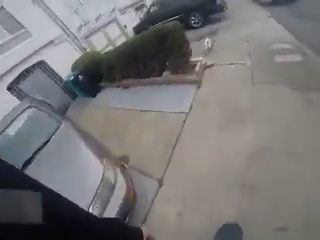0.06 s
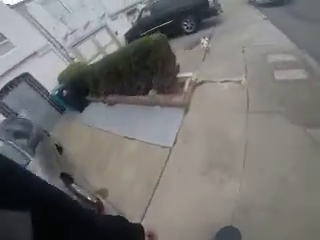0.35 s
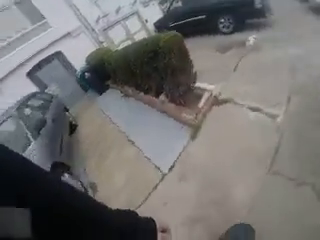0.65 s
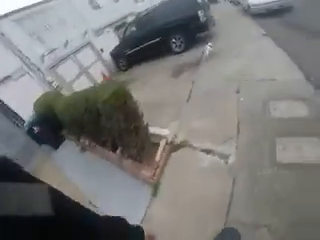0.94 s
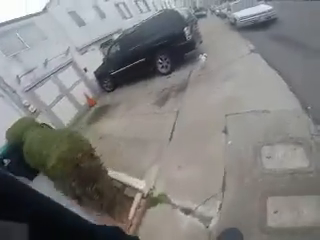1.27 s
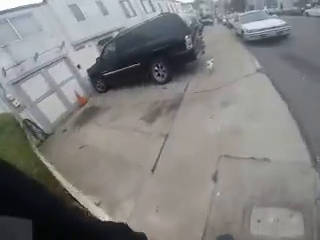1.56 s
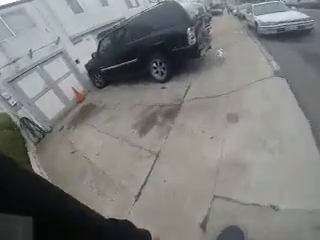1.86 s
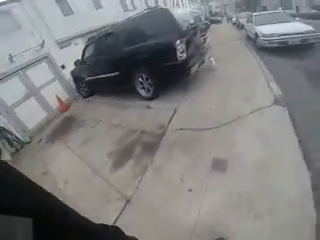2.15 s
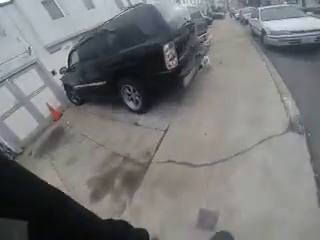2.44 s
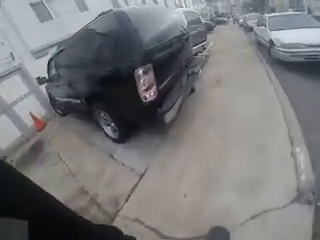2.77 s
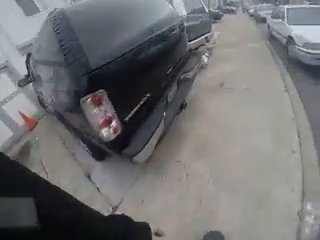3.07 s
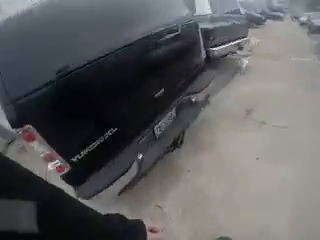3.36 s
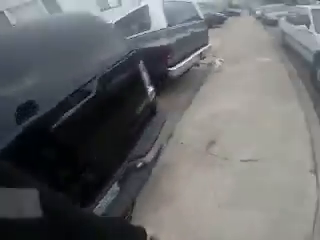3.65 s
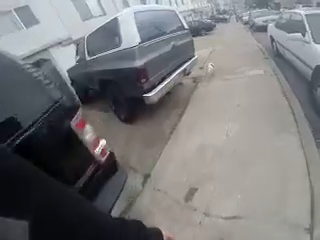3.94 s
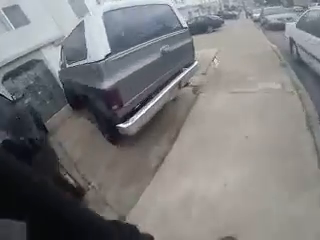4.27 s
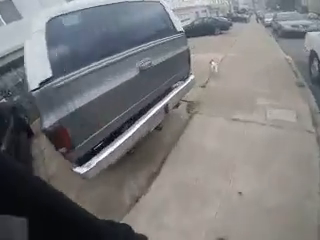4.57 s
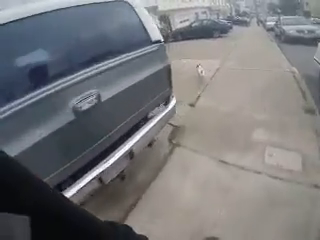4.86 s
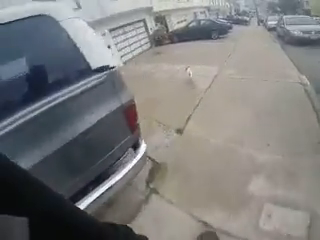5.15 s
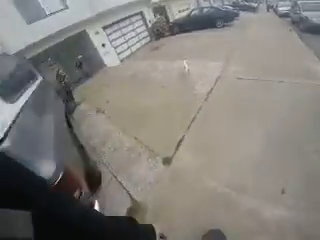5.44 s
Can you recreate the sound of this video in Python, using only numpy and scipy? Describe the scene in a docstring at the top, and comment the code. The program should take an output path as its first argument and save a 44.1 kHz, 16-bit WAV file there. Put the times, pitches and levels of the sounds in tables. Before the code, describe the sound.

Skateboard wheels roll on a concrete sidewalk throughout, a rough low rumble with a gritty crunch and faint hiss, heard from a camera worn on the rider. A few soft thumps and plastic ticks come right at the start. From about 0.7 to 1.1 seconds the camera jolts in the loudest flurry of close thumps, ticks and clothing rubs, with a crunch of gravel. The wheels clack over cracks around 1.2 to 1.5 seconds, then more strongly at 2.2, 2.4 and 3 seconds, each a hollow knock with a metallic rattle. A second cluster of ticks, thumps and rubbing comes from 3.2 to 3.7 seconds. Rolling continues with lighter clacks near 4.3 and 4.5, a brief wheel hiss just after 5, and a sharp clack, thumps and a tick around 5.4 to 5.6. Low wind buffets the microphone, puffing up with each jolt.

```python
"""A plastic tick and a soft thump over rumbling wheels: a skateboard on concrete, from a body camera.
The wheels shake the deck, crunch over grit and gravel, hiss as they slip and clack across cracks.
Jolts shake the camera: its case ticks on the mount, thumps against the rider and rubs on clothing.
Underneath, air buffets the microphone and puffs up with every jolt."""
import sys
import numpy as np
from scipy import signal
from scipy.fft import rfft, irfft, next_fast_len
from scipy.io import wavfile
from scipy.ndimage import uniform_filter1d

SR = 44100
rng = np.random.default_rng(int(sys.argv[2]) if len(sys.argv) > 2 else 0)


def bounce(signal):
    """Save signal as a 16-bit WAV file at the path given by the first command-line argument."""
    frames = np.transpose(np.atleast_2d(signal))
    limited = np.clip(frames, -1, 1)
    pcm = np.round(limited * 32767).astype(np.int16)
    wavfile.write(sys.argv[1], SR, pcm)


N = 247401
TIME = np.arange(N) / SR
AGE = TIME[:8192]  # seconds into a single hit

# pavement texture under the wheels: t/s, rumble level/dB, grit level/dB
PAVEMENT = [(0, -50, -63), (.55, -53.5, -63.5), (.8, -48.5, -59), (1.25, -54.5, -59.5), (1.7, -52, -61),
            (2.2, -49, -60.5), (2.6, -49, -62), (3.05, -51.5, -58.5), (3.48, -45.5, -61), (3.72, -51, -62),
            (4.2, -50.5, -64), (4.6, -50.5, -61.5), (5.1, -47.5, -64.5), (5.61, -51, -58)]
# low body of wheels and deck: f/Hz, level/dB
RUMBLE_EQ = [(30, -2.5), (100, -4), (170, 0.5), (250, -4.5), (340, -4), (500, -4.5), (740, -9), (1000, -19),
             (1400, -24.5), (3000, -43.5)]
# crunch of grit and metal trucks: f/Hz, level/dB
GRIT_EQ = [(300, -52), (900, -20), (1200, -2.5), (1550, 5.5), (1900, -0.5), (2250, 0.5), (2800, -1.5),
           (3100, -3.5), (3800, -9.5), (4400, -5), (5500, -22), (6300, -13), (8000, -19), (10500, -19),
           (15000, -41.5)]
# hiss of the wheels: f/Hz, level/dB
HISS_EQ = [(1000, -17), (2200, 18), (3500, 8), (5600, 12.5), (7000, -7), (10000, -8), (15000, -51)]
# sideways wheel slips: t/s, level/dB, swell and fade/s
WHEEL_SLIPS = [(2.2, -64, 0.056), (5.15, -54, 0.045)]
# a wheel hits a crack or stone: t/s, truck level/dB, deck level/dB, truck treble tilt/(dB per octave)
WHEEL_HITS = [(0.533, -49, -61, 4), (0.772, -45, -47, -1), (1.218, -48.5, -41, 6), (1.292, -45, -55, -15),
              (1.441, -49.5, -55, -10), (1.478, -52, -45.5, 9), (2.022, -45.5, -56, 3),
              (2.139, -44, -51, -8), (2.21, -41.5, -44, -3), (2.22, -36, -41, -11), (2.237, -36, -41.5, -1),
              (2.436, -38.5, -30.5, 5), (2.79, -48, -48, 1), (2.872, -48.5, -50, -11),
              (2.904, -46.5, -53, -7), (2.956, -35, -53, -14), (2.969, -31, -37.5, -5),
              (3.11, -49.5, -47, 0), (3.21, -53, -41.5, 16), (3.234, -45, -45, 3.5), (3.856, -52, -53, 12),
              (4.265, -48, -41, -3), (4.29, -47, -40.5, 5.5), (4.501, -50.5, -40.5, 6),
              (4.677, -48.5, -50, 0), (5.377, -40, -63, -3), (5.388, -36.5, -35, 7.5), (5.528, -42, -49, 0),
              (5.604, -49, -42, 7)]
# metallic ring of the trucks: f/Hz, width/Hz, level/dB
TRUCK_MODES = [(1210, 150, -8.5), (1505, 100, 4.5), (1790, 102, 4), (2315, 290, 1.5), (2902, 73, -2.5),
               (3265, 120, -10.5), (4660, 430, -10.5), (5420, 340, -9)]
# hollow knock of the deck: f/Hz, width/Hz, level/dB
DECK_MODES = [(295, 84, -7.5), (481, 68, -1), (686, 160, -2)]
# loose gravel: thickest at t/s, level/dB, swell/s, fade/s
GRAVEL_PATCHES = [(0.88, -43.5, 0.023, .04), (1.27, -56, 0.047, 0.07), (2.225, -43.5, 0.088, 0.013),
                  (2.95, -55.5, 0.15, 0.028), (3.225, -53, 0.034, 0.01), (4.481, -54, 0.037, 0.039),
                  (5.39, -44.5, 0.018, 0.024)]
# the camera bumps the body: t/s, level/dB, nominal f/Hz, rebound gap/s, step per rebound/dB
JOLTS = [(0.035, -24.5, 124, .009, -30), (0.061, -26, 170, 0.011, -14), (0.376, -31, 132, .011, -10),
         (0.716, -24.5, 153, 0.01, -18), (0.7422, -10, 225, .017, -7), (0.838, -23.5, 120, 0.0071, -18),
         (0.861, -15.5, 105, 0.027, -2.5), (0.873, -15, 185, 0.024, -6), (0.979, -21, 175, 0.01, -21),
         (1.002, -18, 139, 0.0054, -20), (1.015, -18, 130, 0.021, -7), (1.084, -15.5, 240, 0.0098, -5.5),
         (1.161, -28, 127, 0.014, -22), (1.362, -27.5, 117, 0.0093, -15), (2.225, -30.5, 111, 0.012, -12),
         (2.445, -27.5, 160, 0.008, -9), (3.236, -32, 130, 0.011, -19), (3.473, -23.5, 189, .009, -24),
         (3.498, -14, 245, .0125, -4), (3.571, -23.5, 109, 0.012, -19), (3.595, -20.5, 226, .022, -3.5),
         (3.611, -16.5, 125, .02, -9.5), (4.497, -34, 136, .01, -6), (5.365, -33, 124, .009, -21),
         (5.452, -39, 150, 0.011, -8), (5.528, -28, 115, 0.0082, -18)]
# wobble of the camera mount: f/Hz, width/Hz, level/dB
MOUNT_MODES = [(85, 47, 7.5), (127, 6.1, -2), (225, 84, 3), (343, 20, -35)]
# creak of the mount's joint: f/Hz, width/Hz, level/dB
JOINT_MODES = [(1012, 170, -3), (1310, 180, 5.5), (1770, 320, 1), (2150, 480, -1)]
# hum of the stiff bracket: f/Hz, level/dB
BRACKET_TONES = [(335, 16.5), (635, 4)]
# the case snaps against the mount: t/s, level/dB, ring near 2 kHz/dB, brightness/dB
CASE_TICKS = [(0.035, -36, 0, -13.5), (0.352, -34, 4.5, -13), (0.374, -39, 5.5, -13),
              (0.678, -42, 4, -15.5), (0.7148, -33.5, 0, -19.5), (0.8371, -33.5, -2, -3.5),
              (0.847, -34, 5, -6), (0.8691, -30.5, 3.5, -2), (0.8977, -38.5, -4, -2.5),
              (0.938, -43.5, 7, -25), (0.9457, -35, -3, -9), (0.9782, -29.5, -1, -13.5),
              (1.082, -37.5, -5, -4), (1.16, -44, 1, -28), (1.363, -44.5, -12, -12),
              (3.1544, -30.5, 5.5, -11), (3.313, -50, 6, -2.5), (3.368, -30.5, -6, -6.5),
              (3.472, -33, -1, -8.5), (3.571, -37.5, -4, -6.5), (3.628, -42.5, -7, -7),
              (5.3868, -49.5, -2, -5), (5.5432, -33.5, 4.5, -13)]
# ring of the plastic case: f/Hz, t60/s, level/dB
CASE_MODES = [(531, 0.042, -13), (752, 0.041, -11), (1101, 0.025, -4.5), (1382, 0.033, -5.5),
              (1649, 0.022, 2), (1870, 0.047, -3.5), (2152, 0.01, -1.5), (2370, 0.013, -4.5),
              (2677, 0.026, -9), (3290, 0.0076, -7.5), (3960, 0.016, -4), (4364, 0.019, 2.5),
              (4980, 0.019, -5), (5500, 0.01, -6.5), (6930, 0.0042, -13.5), (8000, 0.012, -6),
              (8510, 0.0085, -4), (8380, 0.015, -17.5), (10230, 0.0051, -12.5), (11830, 0.0086, -14.5),
              (13300, 0.0052, -15), (14500, .01, -21)]
# clothing drags across the case: t/s, level/dB, swell and fade/s
CLOTH_DRAGS = [(0.013, -42, 0.012), (0.14, -52, 0.023), (0.745, -45.5, 0.021), (0.877, -35.5, .022),
               (3.5, -49, 0.074), (3.614, -47.5, 0.0096), (3.74, -51.5, 0.019), (5.59, -52, 0.036)]
# air on the microphone: f/Hz, level/dB
WIND_EQ = [(10, -4), (26, -3), (45, -11), (80, -11.5), (150, -22.5), (400, -47)]


def rolling(rattle_db=-2, hiss_floor_db=-67.5):
    """Rough concrete shakes wheels and deck; sand crunches in flurries and slipping wheels hiss."""
    rumble_gain, grit_gain = curves(PAVEMENT)
    bumps = drift(45)
    rumble = colour(grains(5000, 3.1), RUMBLE_EQ) * undb(1.3 * bumps)
    crunch = grains(2000, 3) + .8 * rng.standard_normal(N)
    grit = colour(crunch * undb(bumps + 1.25 * drift(170)), GRIT_EQ)
    stray_grains = chatter(per_s=30, spread_db=2.4, burst_s=.0042)
    rattle = unit(soften(ring(stray_grains, TRUCK_MODES), hz=6200)) * undb(rattle_db)
    hiss = colour(grains(3000, 2.5), HISS_EQ)
    slips = sum(undb(db) * swell(s, fade_s, fade_s) for s, db, fade_s in WHEEL_SLIPS)
    return rumble * rumble_gain + (grit + rattle) * grit_gain + hiss * (undb(hiss_floor_db) + slips)


def clacks(rattle_s=.0047, shudder_s=.0098, scatter_db=6):
    """A wheel strikes a crack or a stone: the truck rattles, the deck takes one blow and shudders."""
    out = np.zeros(N)
    tail = .13 * np.exp(-AGE / .016)
    for s, truck_db, deck_db, tilt_db in WHEEL_HITS:
        truck_noise, deck_noise = rng.standard_normal((2, len(AGE)))
        # every hit lands on another spot and favours other modes
        modes = [(hz, width, db + tilt_db * np.log2(max(hz / 2340, 1)) + scatter_db * rng.uniform(-2, 1))
                 for hz, width, db in TRUCK_MODES]
        truck = ring(truck_noise * (np.exp(-(AGE / rattle_s) ** 2) + tail), modes)
        truck = soften(truck, hz=6250) + .27 * truck
        blow = 2.9 * np.exp(-AGE / .0002)
        shudder = .5 * deck_noise * (np.exp(-(AGE / shudder_s) ** 2) + tail)
        deck = soften(ring(blow + shudder, DECK_MODES), hz=1100)
        add(out, s - .0003, undb(truck_db) * unit_hit(truck) + undb(deck_db) * unit_hit(deck))
    return out


def gravel(knock_db=-.5):
    """Small stones pass under the wheels at random; each rattles the trucks and knocks the deck."""
    stones = chatter(per_s=100, spread_db=-1, burst_s=.0032)
    truck = unit(soften(ring(stones, TRUCK_MODES), hz=6500))
    deck = unit(soften(ring(stones, DECK_MODES), hz=1070))
    patches = sum(undb(db) * swell(s, rise_s, fade_s) for s, db, rise_s, fade_s in GRAVEL_PATCHES)
    return (truck + undb(knock_db) * deck) * patches


def camera_thumps(wobble_gain=.41, creak_db=-21, hum_db=-31):
    """A soft bump swings the camera out and back; the mount wobbles, its joint creaks, its bracket hums."""
    pushes, overtones = np.zeros((2, N))
    creak_fade = np.exp(-AGE / .0033) + .18 * np.exp(-AGE / .012)
    hum_fade = (1 - np.exp(-AGE / .0006)) * np.exp(-AGE / .012)
    for s, db, hz in bounces():
        swing = 2 * np.pi * hz * (AGE - .012) / 1.203
        add(pushes, s - .0095, -undb(db) * swing * np.exp(-swing ** 2 / 2))
        creak = soften(ring(rng.standard_normal(len(AGE)) * creak_fade, JOINT_MODES), hz=2550)
        creak_gain = undb(db + creak_db) * (hz / 220) ** 2  # a snappier push creaks more
        add(overtones, s + .00101, creak_gain * unit_hit(creak))
        hum = sum(undb(tone_db) * np.sin(2 * np.pi * (tone_hz * AGE + rng.random()))
                  for tone_hz, tone_db in BRACKET_TONES)
        add(overtones, s + .00086, undb(db + hum_db) * hum_fade * hum)
    # the padding passes almost nothing above the mount's top mode
    padding = signal.ellip(6, 1, 45, 390, fs=SR, output="sos")
    return signal.sosfilt(padding, pushes + wobble_gain * ring(pushes, MOUNT_MODES)) + overtones


def bounces(count=3, pitch_ratio=.78, nudge_db=-.5, nudge_hz=200):
    """Jolts rebound ever weaker and duller, and ticks nudge the mount: t/s, level/dB, nominal f/Hz."""
    rebounds = [(s + k * gap_s, db + k * step_db, hz * pitch_ratio ** k)
                for s, db, hz, gap_s, step_db in JOLTS for k in range(count)]
    return rebounds + [(s, db + nudge_db, nudge_hz) for s, db, *_ in CASE_TICKS]


def case_ticks(attack_s=.0012, detune=.018, scatter_db=2, crack_db=-6.5, buzz_db=-16, scrape_db=-18):
    """Hard plastic slides and snaps against its mount; the contact point picks which modes ring most."""
    out = np.zeros(N)
    hz, t60, mode_db = np.transpose(CASE_MODES)
    attack = 1 - np.exp(-AGE / attack_s)
    envelopes = attack * np.exp(-np.log(1000) * AGE / t60[:, None])
    for s, level_db, low_db, bright_db in CASE_TICKS:
        mid_db = -3 + .21 * bright_db  # the upper mids partly follow the brightness
        eq_db = np.interp(hz, [1670, 2130, 4640, 7600], [0, low_db, mid_db, bright_db])
        stretch, spot, phase = rng.uniform(-1.077, 1, (3, len(hz)))
        struck_db = mode_db + eq_db + scatter_db * spot
        cycles = np.outer(hz * (1 + detune * stretch), AGE) + phase[:, None]
        partials = envelopes * np.sin(2 * np.pi * cycles)
        body = sum(undb(db - 5.5) * unit_hit(partial) for db, partial in zip(struck_db, partials))
        # the surfaces grind for an instant, then the mount keeps buzzing faintly
        noise = rng.standard_normal(len(AGE))
        crack = ring(noise * attack * np.exp(-(AGE / .0035) ** 2), zip(hz, hz / 6, struck_db))
        buzz = ring(noise * np.exp(-AGE / .0088), zip(hz, 2.9 / t60, struck_db))
        tick = body + undb(crack_db) * unit_hit(crack) + undb(buzz_db) * unit_hit(buzz)
        add(out, s, undb(level_db) * tick)
        # a glancing, bright contact scrapes into the snap
        scrape = ring(noise * np.exp(-np.abs(AGE - .02) / .0057), zip(hz, 2.3 / t60, struck_db))
        add(out, s - .02, undb(level_db + scrape_db + 1.1 * bright_db) * unit_hit(scrape))
    return out


def cloth_rubs(shift_db=-17, shift_s=.013):
    """Cloth catches and slips on the case, favouring its lower modes; it also shifts at every tick."""
    modes = [(hz, 2.1 / t60, db - 2.9 * np.log2(hz / 1600)) for hz, t60, db in CASE_MODES]
    scratch = ring(grains(2500, 1.7) * undb(3.9 * drift(110)), modes)
    drags = sum(undb(db) * swell(s, fade_s, fade_s) for s, db, fade_s in CLOTH_DRAGS)
    shifts = sum(undb(db + shift_db) * swell(s, shift_s, shift_s) for s, db, *_ in CASE_TICKS)
    return unit(soften(scratch, hz=5330) + .18 * scratch) * (drags + shifts)


def wind(draught_db=-45.5, puff_db=-22.5, jolt_share=.57):
    """A draught wavers at the microphone; every jolt swings it through the air, a slow push farthest."""
    puffs = [undb(puff_db + jolt_share * db) * 150 / hz * swell(s, rise_s=.037, fade_s=.092)
             for s, db, hz, *_ in JOLTS]
    gusts = np.sqrt(undb(draught_db) ** 2 + sum(puff ** 2 for puff in puffs))
    waver = undb(2.4 * drift(14))
    return soften(colour(rng.standard_normal(N), WIND_EQ), hz=151) * gusts * waver


def grains(per_s, spread_db):
    """Tiny impacts of random timing and strength."""
    size = undb(spread_db * np.minimum(rng.exponential(size=N), 4))
    return unit((rng.random(N) < per_s / SR) * size * rng.choice([-1, 1], N))


def chatter(per_s, spread_db, burst_s):
    """Random impacts, each setting off a short burst of noise."""
    bursts = signal.fftconvolve(np.abs(grains(per_s, spread_db)), np.exp(-(AGE / burst_s) ** 2))[:N]
    return bursts * rng.standard_normal(N)


def drift(per_s):
    """Smooth random movement at rms 1."""
    hold = int(SR / per_s)
    steps = np.repeat(rng.standard_normal(N // hold + 1), hold)
    return unit(uniform_filter1d(steps, hold)[:N])


def swell(s, rise_s, fade_s):
    """Envelope that grows to 1 at time s and dies away."""
    return np.exp(np.maximum(-np.abs(TIME - s) / np.where(TIME < s, rise_s, fade_s), -20))


def curves(rows):
    """Each level column of a table as a gain curve."""
    s, *levels = np.transpose(rows)
    return [undb(np.interp(TIME, s, db)) for db in levels]


def colour(x, eq):
    """Shape x with an EQ curve (f/Hz, level/dB), at rms 1."""
    hz, db = np.transpose(eq)
    size = next_fast_len(len(x))
    bins_hz = np.maximum(np.fft.rfftfreq(size, 1 / SR), 1)
    gain = undb(np.interp(np.log(bins_hz), np.log(hz), db))
    return unit(irfft(rfft(x, size) * gain, size)[:len(x)])


def ring(x, modes):
    """Parallel resonators (f/Hz, width/Hz, level/dB) of alternating polarity."""
    return sum((-1) ** k * undb(db) * signal.lfilter(*signal.iirpeak(hz, hz / width, SR), x)
               for k, (hz, width, db) in enumerate(modes))


def soften(x, hz):
    """Low-pass that takes the edge off."""
    return signal.sosfilt(signal.butter(4, hz, fs=SR, output="sos"), x)


def undb(db):
    """Decibels to gain."""
    return 10 ** (np.asarray(db) / 20)


def unit(x):
    """Scale to rms 1."""
    return x / np.sqrt(np.mean(x ** 2))


def unit_hit(x):
    """Scale a hit to the energy of 8 ms at rms 1."""
    return x / np.sqrt(np.sum(x ** 2) / (.008 * SR))


def add(out, s, x):
    """Mix x into out from time s."""
    start = max(int(s * SR), 0)
    out[start:start + len(x)] += x[:max(N - start, 0)]


def scene():
    """Mono mix: board below, camera noises up close, wind behind."""
    board = rolling() + gravel() + clacks()
    camera = case_ticks() + camera_thumps() + cloth_rubs()
    return (board + camera + wind())[None]


def record(dry, top_hz=15400):
    """The camera cuts the top of the treble."""
    return signal.sosfilt(signal.ellip(8, .2, 70, top_hz, fs=SR, output="sos"), dry)


dry = scene()
out = record(dry)
bounce(out)
```